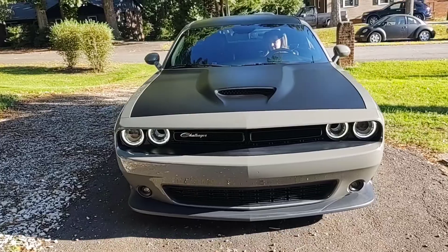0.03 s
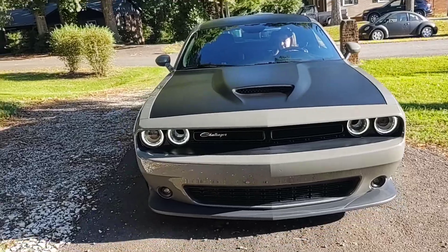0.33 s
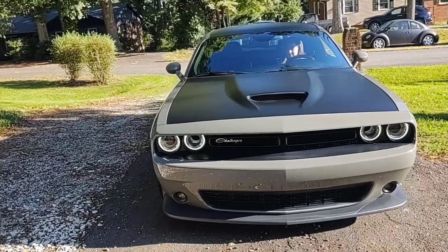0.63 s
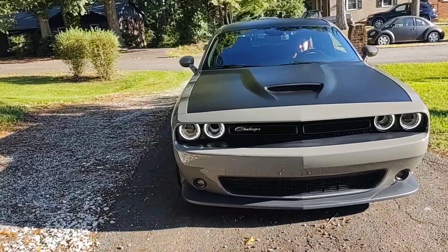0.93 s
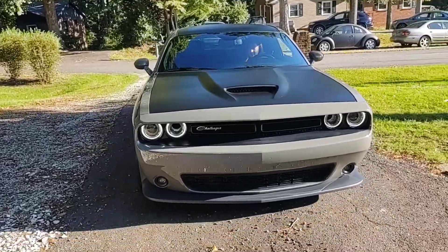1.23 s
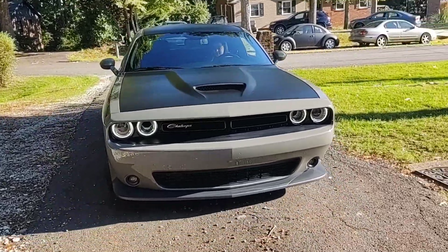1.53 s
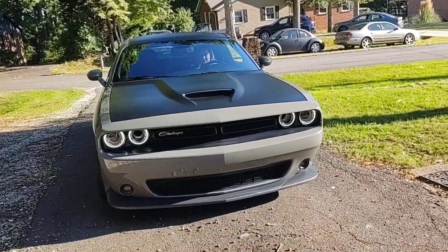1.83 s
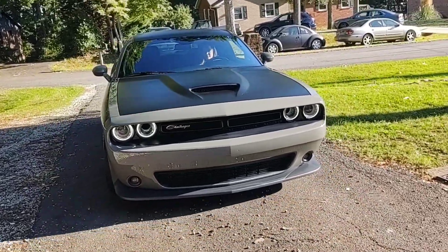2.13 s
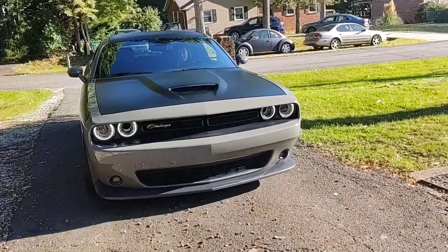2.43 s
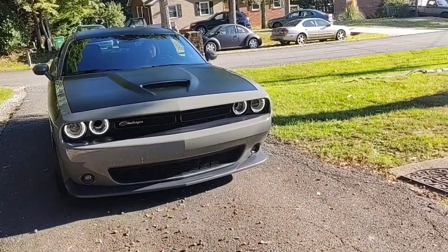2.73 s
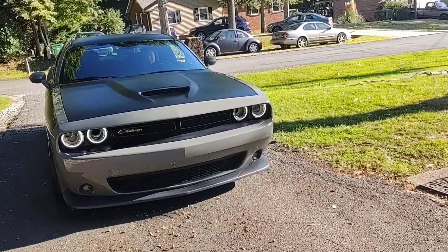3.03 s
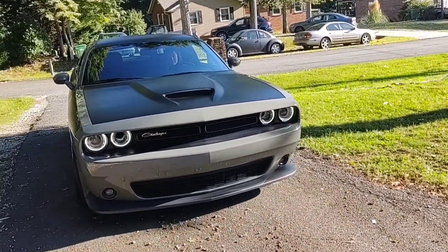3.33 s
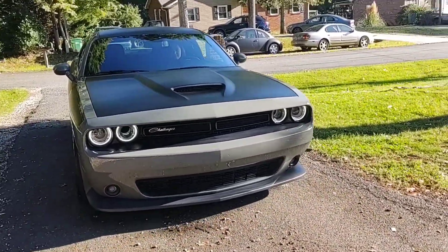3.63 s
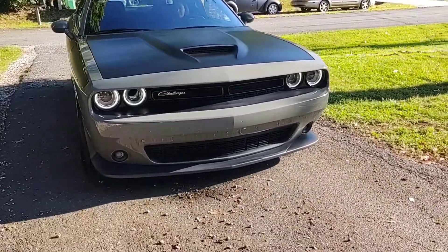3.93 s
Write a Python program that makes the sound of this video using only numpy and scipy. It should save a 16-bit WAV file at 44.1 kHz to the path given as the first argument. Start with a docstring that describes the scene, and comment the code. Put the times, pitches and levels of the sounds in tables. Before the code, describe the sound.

A car engine idles close by outdoors, rumbling with a slight lope and a whirr. Gritty footsteps click and scuff, mostly early on. Thin bird chirps come midway, then a short puff of wind hits the handheld microphone.

```python
"""V8 idling on a driveway

Heard from in front, on a phone carried slowly past. The exhaust throbs at the firing rate and
unequal cylinders add a lope; the engine bay rushes and whirrs. Shoes crunch on grit and a small
bird gives thin high calls. A microphone rings faintly; air buffets both near the end."""
import sys
import numpy as np
from scipy import signal
from scipy.fft import rfft, irfft
from scipy.io import wavfile
from scipy.ndimage import uniform_filter1d

SR = 44100
rng = np.random.default_rng(int(sys.argv[2]) if len(sys.argv) > 2 else 0)


def log_audio(samples):
    """Write samples as a 16-bit WAV file to the path given in sys.argv[1]."""
    # one column per channel
    frames = np.atleast_2d(samples).T
    # limit to full scale, then quantise
    limited = np.clip(frames, -1, 1)
    pcm = np.round(limited * 32767).astype(np.int16)
    wavfile.write(sys.argv[1], SR, pcm)


N = 176400
T = np.arange(N) / SR
BINS_HZ = np.arange(N // 2 + 1) * SR / N
CYLINDERS = 8
STEP_LIKENESS = 0.83  # left-right correlation of the crunch

# engine speed (time [s], speed [rpm])
IDLE_RPM = [(0.0, 823.8), (0.4, 842.4), (0.8, 828.1), (1.1, 824.8), (1.35, 837.2), (1.6, 833.8),
            (2.05, 822.8), (2.4, 834.3), (2.7, 834.0), (3.1, 832.4), (3.6, 839.2), (4.0, 827.0)]


def amp(db):
    """Decibels to gain."""
    return 10 ** (np.asarray(db) / 20)


def unit(x):
    """Scale to rms 1."""
    return x / np.sqrt(np.mean(x ** 2) + 1e-20)


def curve(rows, column=1):
    """Table column, interpolated over time."""
    rows = np.array(rows, float)
    return np.interp(T, rows[:, 0], rows[:, column])


def by_pitch(rows, size):
    """Table interpolated over log frequency at FFT bins."""
    hz, value = np.array(rows, float).T
    return np.interp(np.log(np.arange(size // 2 + 1) * SR / size + 1), np.log(hz), value)


def causal(x, gain):
    """Minimum-phase filter; one gain per bin of a double-length FFT."""
    size = x.shape[-1]
    cepstrum = irfft(np.log(gain))
    cepstrum[1:size] *= 2
    cepstrum[size + 1:] = 0
    return irfft(rfft(x, 2 * size) * np.exp(rfft(cepstrum)))[..., :size]


def colour(x, rows):
    """Filter by a (frequency [Hz], gain [dB]) table."""
    return causal(x, amp(by_pitch(rows, 2 * N)))


def walk(rate_hz):
    """Smooth random drift, rms 1."""
    return unit(irfft(rfft(rng.standard_normal(N)) * np.exp(-(BINS_HZ / rate_hz) ** 2), N))


def stereo_noise(likeness, size=N):
    """White noise with the given left-right correlation."""
    mid, side = rfft(rng.standard_normal((2, size)))
    mid, side = mid * np.sqrt((1 + likeness) / 2), side * np.sqrt((1 - likeness) / 2)
    return irfft(np.array([mid + side, mid - side]), size)


def fade(start_s, decay_s):
    """Instant attack, exponential decay."""
    return (T >= start_s) * np.exp(-np.clip((T - start_s) / decay_s, 0, 50))


def buffet():
    """Air rumbles on each microphone almost independently."""
    # gust (time [s], level [dB])
    gust_db = [(3.15, -89), (3.23, -49), (3.42, -48), (3.5, -41), (3.545, -34), (3.615, -29.5),
               (3.67, -48.5), (4, -50)]
    # rumble spectrum (frequency [Hz], gain [dB])
    spectrum = [(30, -21), (60, -5.5), (90, -1), (140, 0), (200, -12.5), (300, -15), (450, -36),
                (1500, -67)]
    return amp(curve(gust_db)) * unit(colour(stereo_noise(likeness=0.075), spectrum))


def whistle(hz, waver):
    """Tone with fast fractional pitch jitter, rms 1."""
    return np.sqrt(2) * np.sin(2 * np.pi * np.cumsum(hz * (1 + waver * walk(350))) / SR)


def bird():
    """A thin call that dips and rises, fainter rising notes, and their echo among trees."""
    # scooped call (time [s], pitch [Hz], level [dB])
    call = [(2.345, 10900, -68), (2.362, 9000, -60), (2.40, 8230, -53), (2.44, 7800, -53.5),
            (2.47, 7600, -68), (2.51, 7620, -58), (2.55, 8250, -55.5), (2.585, 8800, -58),
            (2.612, 9950, -57)]
    # rising notes (start [s], length [s], from [Hz], to [Hz], level [dB])
    notes = [(1.837, .04, 7300, 8150, -63), (3.726, .16, 5500, 7800, -61.5)]
    flutter_db, echo_db = 2.5, -10
    gate = uniform_filter1d(1. * ((T > call[0][0]) & (T < call[-1][0])), size=400)
    level_db = curve(call, column=2) + flutter_db * walk(70)
    song = gate * amp(level_db) * whistle(curve(call), waver=0.0041)
    for start_s, length_s, from_hz, to_hz, db in notes:
        progress = np.clip((T - start_s) / length_s, 0, 1)
        swell = np.sqrt(np.abs(np.sin(np.pi * progress)))
        song += amp(db) * swell * whistle(from_hz + (to_hz - from_hz) * progress, waver=0.035)
    trees = unit(rng.standard_normal((2, N)) * fade(0, decay_s=0.042)) / np.sqrt(N)
    return song + amp(echo_db) * signal.fftconvolve(song[None], trees, axes=1)[:, :N]


def scuffs():
    """Dense tiny grains as a sole rolls over fine grit."""
    # sole rolls (start [s], length [s], level [dB])
    rolls = [(0.081, 0.077, -50.5), (0.268, 0.083, -58), (1.016, 0.15, -57), (1.647, .065, -54),
             (2.372, .08, -57.5)]
    # grain spectrum (frequency [Hz], gain [dB])
    spectrum = [(300, -8.5), (1000, -7.5), (2300, -4), (3800, -8), (7000, -5), (11000, -5), (16000, -25)]
    grains_per_s = 2300
    pressure = np.zeros(N)
    for start_s, length_s, db in rolls:
        progress = np.clip((T - start_s) / length_s, 0, 1)
        pressure += amp(db) * np.sqrt(np.abs(np.sin(np.pi * progress)))
    hits = rng.random(N) < grains_per_s / SR
    grain_db = np.minimum(rng.exponential(size=N), 4)
    return pressure * unit(colour(hits * amp(grain_db) * stereo_noise(STEP_LIKENESS), spectrum))


def heels():
    """Heel strikes ring briefly with a hollow clack."""
    # strikes (time [s], relative level [dB])
    strikes = [(.0995, -35), (1.6212, -24.5), (1.6261, -32)]
    # clack modes (frequency [Hz], relative level [dB], t60 [s])
    modes = [(1180, 1.5, .03), (1290, -4.5, 0.052), (1470, -2.5, 0.034), (1740, -9.5, 0.047),
             (1990, -10, 0.031), (2670, -19.5, 0.024)]
    out = np.zeros(N)
    for start_s, db in strikes:
        for hz, mode_db, t60_s in modes:
            detuned_hz = hz * (1 + 0.023 * rng.standard_normal())
            envelope = 0.44 * amp(db + mode_db) * fade(start_s, t60_s / np.log(1000))
            out += envelope * np.sin(2 * np.pi * detuned_hz * (T - start_s))
    return out


def clicks(events, spectrum, decay_s, tail_s, tail_db, focus_db):
    """Noise cracks, each boosted at its own pitch; the tail is scatter from ground and car."""
    size = 4096
    out, t = np.zeros((2, N + size)), T[:size]
    envelope = np.sqrt(np.exp(-2 * t / decay_s) + amp(tail_db) ** 2 * np.exp(-2 * t / tail_s))
    envelope_rms = np.sqrt(np.mean(envelope ** 2))
    bins_hz = np.arange(size + 1) * SR / size / 2 + 1
    for start_s, db, hz in events:
        focus = np.exp(-2 * np.log2(bins_hz / hz) ** 2)
        gain = amp(by_pitch(spectrum, 2 * size) + focus_db * focus)
        crack = causal(stereo_noise(STEP_LIKENESS, size) * envelope, unit(gain))
        start = int(start_s * SR)
        out[:, start:start + size] += amp(db) * unit(crack) * envelope_rms
    return out[:, :N]


def grit_snaps():
    """Grit snaps sharply under a shoe."""
    # snaps (time [s], level [dB], pitch [Hz])
    snaps = [(.029, -44, 13100), (.0985, -31, 10000), (.1005, -29, 6000), (.237, -57, 12000),
             (.2435, -33, 11000), (.300, -40, 5070), (.340, -41, 9050), (.461, -36.5, 11700),
             (.6345, -42, 6950), (1.0185, -38.5, 3450), (1.029, -40, 12000), (1.039, -42, 9000),
             (1.049, -32, 11500), (1.0505, -36, 4500), (1.111, -45, 10200), (1.1115, -40, 2770),
             (1.292, -44, 5000), (1.6665, -43, 6000), (1.688, -55, 6000), (2.338, -35.5, 5490),
             (2.42, -55, 9000), (2.965, -39, 3800), (3.601, -38, 5000), (3.719, -40.5, 11000)]
    # snap spectrum (frequency [Hz], gain [dB])
    spectrum = [(300, -14), (1000, -40), (2500, 5.5), (5000, 3), (7000, 4), (10500, 1.5), (13000, -1),
                (16000, -28.5)]
    return clicks(snaps, spectrum, decay_s=0.00075, tail_s=0.0085, tail_db=-18, focus_db=12)


def sole_knocks():
    """The sole knocks dully on stones."""
    # knocks (time [s], level [dB], pitch [Hz])
    knocks = [(.099, -29, 1500), (.105, -36, 1540), (.129, -30.5, 1080), (.140, -44, 1000),
              (.148, -29.5, 1090), (.153, -35, 805), (.236, -37, 1090), (.2995, -37, 1190),
              (1.051, -40.5, 800), (1.089, -47, 2000), (1.102, -36.5, 2000), (1.111, -30, 1300),
              (1.6665, -35, 2220), (1.673, -34, 2200), (1.688, -39.5, 2000), (2.371, -39, 900),
              (3.719, -36, 890)]
    # knock spectrum (frequency [Hz], gain [dB])
    spectrum = [(150, -9.5), (500, 4), (1000, 1.5), (1500, -0.5), (2300, -6.5), (3500, -16), (6000, -20.5),
                (15000, -46)]
    return clicks(knocks, spectrum, decay_s=0.0018, tail_s=0.018, tail_db=-14, focus_db=5)


def bay_rush(cycle):
    """Broad rush of engine bay and street, throbbing with the firings."""
    # base spectrum (frequency [Hz], density [dB/Hz])
    spectrum = [(25, -93.5), (45, -80), (90, -73), (150, -69.5), (280, -78), (400, -82.5), (600, -83.5),
                (850, -83), (1200, -86.5), (1600, -90), (2700, -93.5), (3300, -99), (5000, -100),
                (7500, -100), (10500, -103), (13000, -108), (16000, -113)]
    # left-right likeness (frequency [Hz], correlation [0-1])
    likeness = [(100, 1), (250, 0.96), (450, 0.75), (1200, 0.68), (2500, 0.06), (5000, 0), (12000, 0.02)]
    # slow swell (time [s], gain [dB])
    swell_db = [(0, 1.5), (.5, 1.2), (1.2, 1), (2.2, 0), (3.1, 0), (4, 0.55)]
    throb_depth, flicker_db = 0.066, 0.62
    rush = colour(stereo_noise(by_pitch(likeness, N)), spectrum) * np.sqrt(SR / 2)
    throb = 1 + throb_depth * np.cos(2 * np.pi * CYLINDERS * cycle)
    return rush * throb * amp(curve(swell_db) + flicker_db * walk(34))


def whirr_and_mic_ring():
    """Engine-bay whirr at 500-1100 Hz, plus a thin high microphone ring at 8.7 kHz."""
    # resonances (frequency [Hz], width [Hz], start level [dB], knee level [dB], end level [dB])
    resonances = [(508.3, 16, -69, -73.5, -61), (709, 31, -58, -65.5, -79), (785, 11.6, -60, -63, -62),
                  (1064, 48, -58.5, -58.5, -75), (8700, 120, -64, -76, -71)]
    knee_s = 1.17
    out = np.zeros((2, N))
    for hz, width_hz, *levels_db in resonances:
        peak = 1 / (1 + 2 * ((BINS_HZ - hz) / width_hz) ** 2)
        ring = irfft(rfft(stereo_noise(likeness=0.93)) * peak, N)
        out += unit(ring) * amp(np.interp(T, [0, knee_s, T[-1]], levels_db))
    return out


def chuff(cycle):
    """One cylinder softly rings the pipe once per engine cycle."""
    pipe_hz, level_db = 274, -45
    centre_cycles, width_cycles = -0.018, 0.11
    offset_cycles = (cycle - centre_cycles + .5) % 1 - .5
    offset_s = offset_cycles * 120 / curve(IDLE_RPM)
    swell = amp(level_db) * np.exp(-(offset_cycles / width_cycles) ** 2 / 2)
    return swell * np.sqrt(2) * np.cos(2 * np.pi * pipe_hz * offset_s)


def exhaust(cycle):
    """Every eighth order is a firing tone; unequal cylinders add the lope orders between."""
    # exhaust tones (order [per engine cycle], relative level [dB])
    orders = [(1, -31), (2, -48), (3, -43), (4, -40), (5, -41), (6, -31), (7, -47), (8, -4), (9, -48),
              (10, -42), (11, -44), (12, -20), (13, -85), (14, -20.5), (15, -21.5), (16, 2.5), (17, -16.5),
              (18, -16), (19, -19), (20, -49), (21, -20), (22, -26.5), (23, -44), (24, -6.5), (25, -18),
              (26, -34), (27, -20.5), (28, -32), (29, -27.5), (30, -19), (31, -28.5), (32, -47),
              (33, -28.5), (34, -32), (35, -21), (36, -35), (37, -32), (38, -37.5), (39, -29.5), (40, -19),
              (41, -30.5), (42, -28), (43, -31), (44, -31), (45, -33), (46, -43), (47, -31.5), (48, -37.5)]
    # eight firings, two weak; sets only the tones' phases (strength [dB])
    firing_db = [0.5, 1.5, -1.5, 0.5, 2.65, 0.2, -0.16, -3]
    # exhaust loudness (time [s], level [dB])
    level_db = [(0, -33), (.5, -32.5), (1.1, -33), (2.0, -32.5), (2.5, -33), (3.1, -35.5), (3.45, -34),
                (4, -33)]
    firing_rad = np.angle(np.fft.fft(amp(firing_db)))
    tones = np.zeros(N)
    for order, db in orders:
        if order % CYLINDERS:  # lope
            waver_db, waver_rad, lag_cycles = -0.7, 0.12, 0.012
        else:
            waver_db, waver_rad, lag_cycles = 0.39, 0, 0
        gain = amp(db + waver_db * walk(1.9))
        phase = 2 * np.pi * order * (cycle - lag_cycles) + firing_rad[order % CYLINDERS]
        tones += gain * np.cos(phase + waver_rad * walk(9))
    return unit(tones) * amp(curve(level_db))


def scene():
    """Idling car, microphone ring, footsteps, bird and air."""
    cycle = np.cumsum(curve(IDLE_RPM)) / SR / 120 - 0.067  # two crank turns per engine cycle
    crunch = grit_snaps() + sole_knocks()
    drone = exhaust(cycle) + chuff(cycle) + bay_rush(cycle) + whirr_and_mic_ring()
    footsteps = crunch + heels() + scuffs()
    return drone + footsteps + bird() + buffet()


def record(dry):
    """Two unlike microphones; the phone cuts the top."""
    # dull left microphone (frequency [Hz], gain [dB])
    left_mic = [(250, 0.5), (1000, -1.5), (2500, 2), (4500, -0.5), (7000, -0.5), (8500, -4.5), (10000, -13),
                (15000, -6.5)]
    # bright right microphone (frequency [Hz], gain [dB])
    right_mic = [(250, 0.5), (600, -1), (1300, 4), (2500, 4), (3300, -0.5), (4500, -4), (7000, 1),
                 (8600, 6), (11000, 5.5), (15000, 5)]
    cutoff_hz = 15900
    heard = np.array([colour(dry[0], left_mic), colour(dry[1], right_mic)])
    return signal.sosfilt(signal.ellip(10, .2, 80, cutoff_hz, fs=SR, output="sos"), heard)


dry = scene()
out = record(dry)
log_audio(out)
```